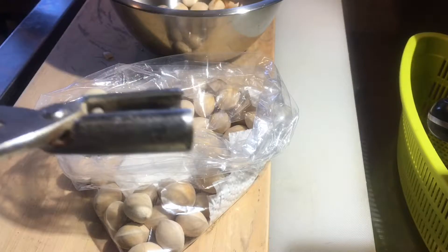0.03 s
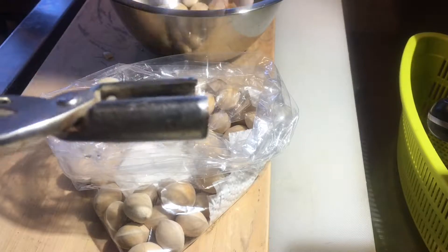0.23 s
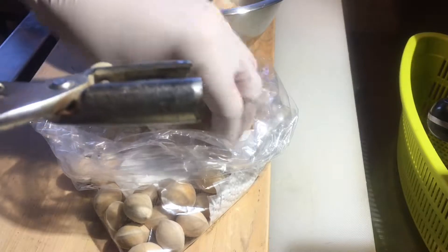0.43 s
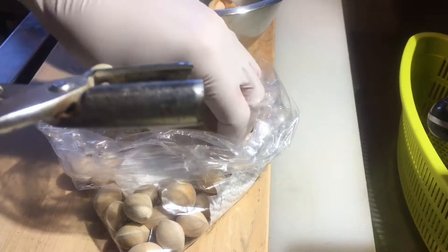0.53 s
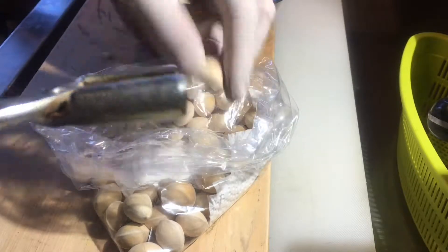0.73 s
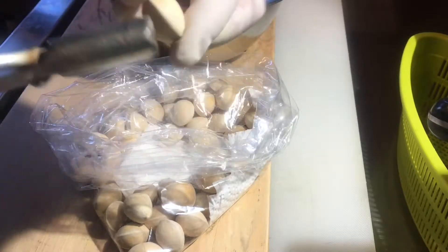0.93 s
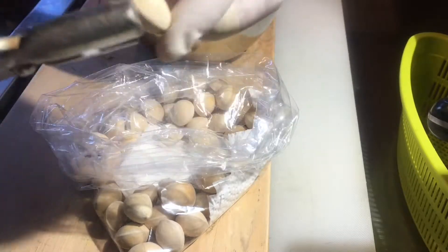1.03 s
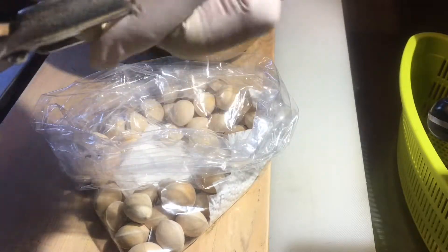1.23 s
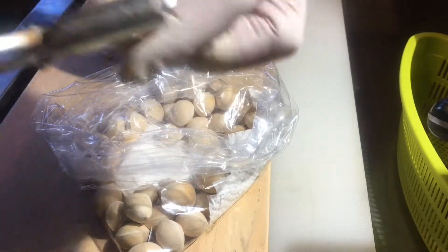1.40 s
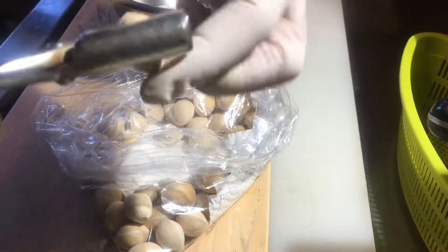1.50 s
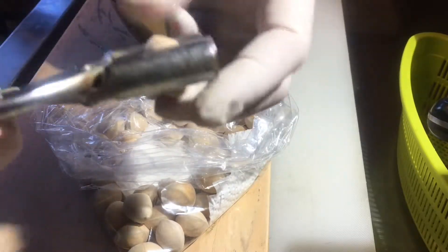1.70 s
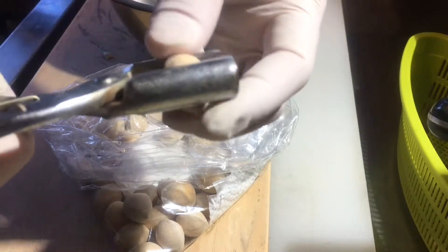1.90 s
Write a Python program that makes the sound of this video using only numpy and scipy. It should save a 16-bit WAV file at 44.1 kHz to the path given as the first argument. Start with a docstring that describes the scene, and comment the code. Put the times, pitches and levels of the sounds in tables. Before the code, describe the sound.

One sharp metallic nut crack, followed by nuts clicking together in a faintly crinkling plastic bag.

```python
"""Small kitchen, close up. Throughout: appliance hum, faint stereo background noise, interference ticks.
After one faint crinkle, a nut splits in a steel hand cracker; the jaws ring with one sharp clink.
A hand reaches into a plastic bag for the next nut: a light tap on metal, then shells knock
together, setting off a faint metal ring, and the film crinkles.
The nut brushes the open jaws, which ring faintly. A few last crinkles follow."""
import sys
import numpy as np
from scipy import signal
from scipy.fft import rfft, irfft
from scipy.io import wavfile

SR = 44100
rng = np.random.default_rng(int(sys.argv[2]) if len(sys.argv) > 2 else 0)


def bounce(signal):
    """Save signal as a 16-bit WAV file at the path given by the first command-line argument."""
    frames = np.transpose(np.atleast_2d(signal))
    limited = np.clip(frames, -1, 1)
    pcm = np.round(limited * 32767).astype(np.int16)
    wavfile.write(sys.argv[1], SR, pcm)


N = 85995
TIME_S = np.arange(N) / SR
FREQ_HZ = np.fft.rfftfreq(N, 1 / SR)

# motor tones (frequency [Hz], rms level [dB])
HUM_TONES = [(59.2, -41.5), (91.5, -43.5), (113.0, -38), (226.1, -52.5), (296.1, -53.5), (366.1, -58.5),
             (441.4, -54)]
# moving air (frequency [Hz], relative density [dB])
AIR_SPECTRUM = [(15, -34), (25, -24.5), (114, -1.5), (137, -12), (161, -10.5), (223, -7.5), (373, -16),
                (439, -18.5), (503, -17), (988, -23), (1520, -22.5), (3160, -47.5), (6210, -57),
                (6920, -55.5), (16000, -60.5)]
# stereo background noise (frequency [Hz], relative density [dB])
SIDE_SPECTRUM = [(35, -81), (60, -40), (330, -14.5), (363, 1.5), (785, -27), (968, -13.5), (1660, -56),
                 (2410, -20), (3270, -37), (16000, -36)]
# one interference tick (frequency [Hz], gain [dB])
TICK_SPECTRUM = [(300, -17), (1700, -19), (3300, -26.5), (5000, -28), (6400, -21), (7200, -34.5),
                 (9700, -35), (10600, -55), (15500, -51)]
# bag and glove crinkles (time [s], level [dB], length [s], centre [Hz])
CRINKLES = [(0.126, -68, 0.02, 12000), (0.498, -60, 0.017, 4870), (0.539, -64, 0.019, 5940),
            (0.58, -66, 0.014, 12000), (0.666, -72, .006, 5500), (0.683, -62, .008, 5460),
            (0.69, -52.5, 0.0045, 5100), (0.832, -58.5, 0.0028, 5960), (0.998, -62, 0.013, 2300),
            (0.456, -67, .015, 11000), (1.029, -66.5, 0.023, 12000), (1.432, -61, 0.0068, 3230),
            (1.472, -52.5, 0.006, 2500), (1.49, -66, .03, 10900), (1.734, -64, 0.0095, 3640)]
# steel cracker (frequency [Hz], relative level [dB], t60 [s])
STEEL_MODES = [(630, -22, .11), (888, -10, .05), (1163, -9.5, .07), (1446, -9.5, .165), (1668, -14, .11),
               (1740, -10, .072), (1970, -44, .9), (2038, -25, .1), (1071, -28, .2), (3365, -26, .075),
               (3795, -48, .28), (4295, -41, .13), (5515, -43, .15), (8430, -42, .07)]
# splitting shell (frequency [Hz], relative density [dB])
SHELL_SPECTRUM = [(150, -43), (400, -29), (600, 0), (950, -2), (1750, -1.5), (2200, -12), (2800, -14.5),
                  (4500, -27), (8300, -26), (11000, -35), (16000, -39)]
# click of the tap (frequency [Hz], relative density [dB])
CLICK_SPECTRUM = [(300, 2), (1000, 9.5), (2500, -5), (6000, -17), (9000, -42), (16000, -43)]
# tapped metal (frequency [Hz], relative level [dB], t60 [s])
TAP_MODES = [(454.4, -38.5, 0.5), (812, -32, 0.11), (902, -30.5, .13), (1200, -42.5, 0.27),
             (1540, -35, 0.087), (2487, -50, 0.42)]
# nut on nut (time [s], level [dB], rattle t60 [s], tilt [dB/octave])
KNOCKS = [(.494, -33.5, 0.033, 4), (.5072, -22, 0.052, -0.5), (0.5362, -30.5, 0.096, 1.5),
          (.543, -29, 0.059, -4.5), (.5645, -30, 0.028, -5), (.573, -37, 0.05, 6), (.6355, -36, 0.036, -3),
          (.650, -35.5, 0.074, 1), (.667, -38, 0.18, 5), (.725, -37, 0.091, -8), (0.74, -39, 0.075, 2),
          (.752, -44, 0.041, 0.5), (.773, -55, .03, -2), (.795, -38, 0.13, -1.5)]
# heap of shells; last row, a faint metal ring (frequency [Hz], relative level [dB], t60 [s])
KNOCK_MODES = [(627, -7.5, 0.014), (860, -3.5, 0.033), (964, -2.5, .04), (1378, -2.5, 0.022),
               (1743, -3.5, 0.019), (1976, -11, 0.031), (2183, -14, 0.021), (2540, -14, 0.015),
               (3240, -17.5, 0.005), (5400, -20.5, 0.0018), (1177, -25, 0.6)]
# open jaws (frequency [Hz], level [dB], t60 [s])
OPEN_JAW_MODES = [(2950, -68.5, 1.9), (11050, -77, .4)]
# kitchen reverberation (frequency [Hz], t60 [s])
ROOM_DECAY = [(300, 0.28), (1400, 0.19), (3000, 0.26), (8000, 0.22), (15000, .24)]

CRACK_S = .2358


def amp(db):
    """Decibels to gain."""
    return 10 ** (np.asarray(db) / 20)


def unit(x):
    """Scale to rms 1."""
    return x / np.sqrt(np.mean(x ** 2) + 1e-20)


def lookup(table, hz):
    """Interpolate over log frequency."""
    table_hz, values = np.transpose(table)
    return np.interp(np.log(hz + 1), np.log(table_hz + 1), values)


def noise(spectrum):
    """Steady shaped noise, rms 1."""
    return unit(irfft(rfft(rng.standard_normal(N)) * amp(lookup(spectrum, FREQ_HZ)), N))


def wander(rate_hz):
    """Slow random motion, rms 1."""
    return unit(irfft(rfft(rng.standard_normal(N)) * np.exp(-(FREQ_HZ / rate_hz) ** 2), N))


def decay(start_s, t60_s):
    """Step to 1, then exponential fall."""
    return (TIME_S >= start_s) * np.exp(-np.log(1000) * np.maximum(TIME_S - start_s, 0) / t60_s)


def ring(modes, start_s):
    """Damped modes struck together, signs alternating."""
    return sum((-1) ** k * amp(db) * decay(start_s, t60_s) * np.sin(2 * np.pi * hz * (TIME_S - start_s))
               for k, (hz, db, t60_s) in enumerate(modes))


def appliance(waver_depth=.11, drift_hz=.42, air_db=-41):
    """Wavering motor tones over moving air."""
    hum = np.zeros(N)
    for hz, db in HUM_TONES:
        rms = amp(db) * (1 + waver_depth * wander(rate_hz=7.8))
        cycles = rng.random() + np.cumsum(hz + drift_hz * wander(rate_hz=2.8)) / SR
        hum += np.sqrt(2) * rms * np.sin(2 * np.pi * cycles)
    return hum + amp(air_db) * noise(AIR_SPECTRUM)


def stereo_noise(level_db=-68):
    """Faint steady background noise."""
    return amp(level_db) * noise(SIDE_SPECTRUM)


def interference(fast_period_s=.05, slow_period_s=1, fft_size=512):
    """Identical electrical ticks in two regular trains."""
    times_s = np.r_[np.arange(.0393, N / SR, fast_period_s), np.arange(.2057, N / SR, slow_period_s)]
    train = np.bincount((times_s * SR).astype(int), minlength=N)
    log_gain = np.log(amp(lookup(TICK_SPECTRUM, abs(np.fft.fftfreq(fft_size, 1 / SR)))))
    tick = np.fft.ifft(np.exp(np.conj(signal.hilbert(log_gain)))).real  # minimum phase
    return signal.fftconvolve(train, tick[:fft_size // 2])[:N]


def crinkle(time_s, db, length_s, centre_hz, width_octaves=.54, grain_db=6):
    """A swell of tiny snaps in thin film."""
    snaps = rng.standard_normal(N) * amp(grain_db * np.minimum(rng.exponential(1, N), 4))
    octaves = np.log2((FREQ_HZ + 1) / centre_hz)
    film = unit(irfft(rfft(snaps) * np.exp(-.5 * (octaves / width_octaves) ** 2), N))
    return amp(db) * film * np.exp(-2 * ((TIME_S - time_s) / length_s) ** 2)


def bag():
    """Single crinkles, a soft rustle and the swish of a glove sliding on film."""
    crinkles = sum(crinkle(*row) for row in CRINKLES)
    rustle = crinkle(time_s=.54, db=-65.5, length_s=.26, centre_hz=4840)
    swish = crinkle(time_s=.53, db=-66, length_s=.13, centre_hz=12000)
    return crinkles + rustle + swish


def cracker(gain_db=1, rise_s=.00076):
    """Steel jaws ring as the shell gives way."""
    rise = np.clip((TIME_S - CRACK_S) / rise_s, 0, 1)
    return amp(gain_db) * ring(STEEL_MODES, CRACK_S) * rise


def shell(level_db=-15.5, rise_s=.00058, hold_s=.007, t60_s=.081):
    """The shell splits in one dense noise burst."""
    rise = np.clip((TIME_S - CRACK_S) / rise_s, 0, 1)
    fall = np.exp(-np.log(1000) * np.maximum(TIME_S - CRACK_S - hold_s, 0) / t60_s)
    return amp(level_db) * noise(SHELL_SPECTRUM) * rise * fall


def tap(start_s=.4318, click_db=-27.5, scrape_db=-36, ring_gain_db=3.5):
    """Light tap on metal: click, short scrape, thin ring."""
    click = amp(click_db) * noise(CLICK_SPECTRUM) * decay(start_s, t60_s=.017)
    scrape = amp(scrape_db) * noise(SHELL_SPECTRUM) * decay(start_s, t60_s=.14)
    return click + scrape + amp(ring_gain_db) * ring(TAP_MODES, start_s)


def nuts(rattle_per_s=1600, rattle_gain=.71):
    """Per knock, one contact and a dying rattle excite the heap of shells and a faint metal ring."""
    octaves = np.log2(np.clip(FREQ_HZ, 500, 5000) / 1200)
    response = rfft(ring(KNOCK_MODES, 0))
    knocks = np.zeros(N)
    for start_s, db, t60_s, tilt_db_per_octave in KNOCKS:
        rattle = rng.standard_normal(N) * (rng.random(N) < rattle_per_s / SR)
        contacts = rattle_gain * rattle * decay(start_s, t60_s)
        contacts[round(start_s * SR)] += 1
        knock = irfft(rfft(contacts) * response * amp(tilt_db_per_octave * octaves), N)
        knocks += amp(db) * unit(knock) * np.sqrt(.01 * SR / N)  # energy of 10 ms at this level
    return knocks


def jaw_brush(start_s=1.02):
    """The next nut brushes the open jaws; they ring faintly."""
    return ring(OPEN_JAW_MODES, start_s)


def kitchen(send, delay_s=.0059, fft_size=256):
    """Short diffuse tail, decay time set per band."""
    hz, age_s, bands = signal.stft(rng.standard_normal(SR // 2), SR, nperseg=fft_size)
    fall = np.exp(-np.log(1000) * age_s / lookup(ROOM_DECAY, hz)[:, None])
    _, tail = signal.istft(bands * fall, SR, nperseg=fft_size)
    tail *= np.clip(np.arange(len(tail)) / SR / delay_s - 1, 0, 1)
    return signal.fftconvolve(send, tail / np.linalg.norm(tail))[:N]


def scene(handling_send_db=-12, shell_send_db=-9):
    """All centred; only the faint background noise has width."""
    handling = cracker() + tap() + nuts() + bag() + jaw_brush()
    split = shell()
    send = amp(handling_send_db) * handling + amp(shell_send_db) * split
    mid = handling + split + kitchen(send) + appliance() + interference()
    side = stereo_noise()
    return np.array([mid + side, mid - side])


def record(dry, cutoff_hz=15950):
    """Soft clip, then low-pass."""
    rounded = dry / (1 + dry ** 12) ** (1 / 12)
    lowpass = signal.firwin(511, cutoff_hz, window=("kaiser", 9), fs=SR)
    return signal.oaconvolve(rounded, lowpass[None], "same")


dry = scene()
out = record(dry)
bounce(out)
```